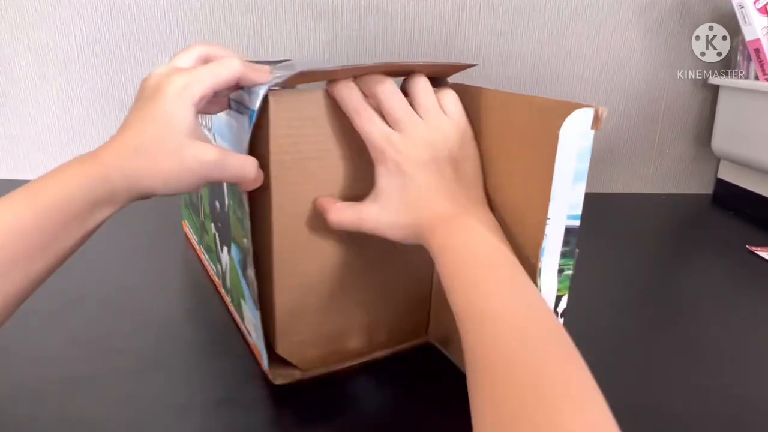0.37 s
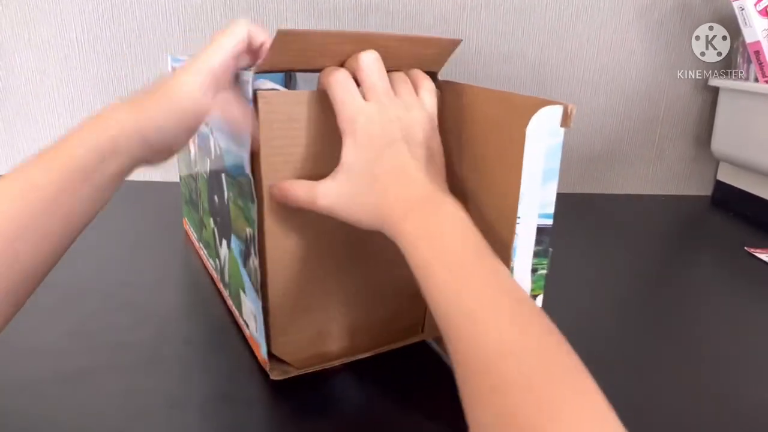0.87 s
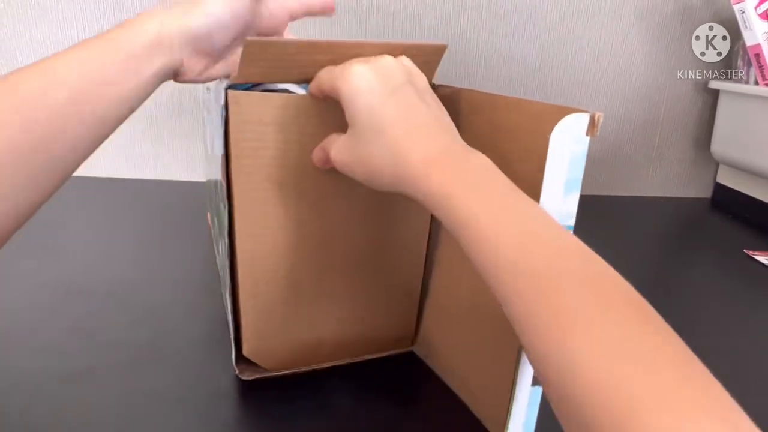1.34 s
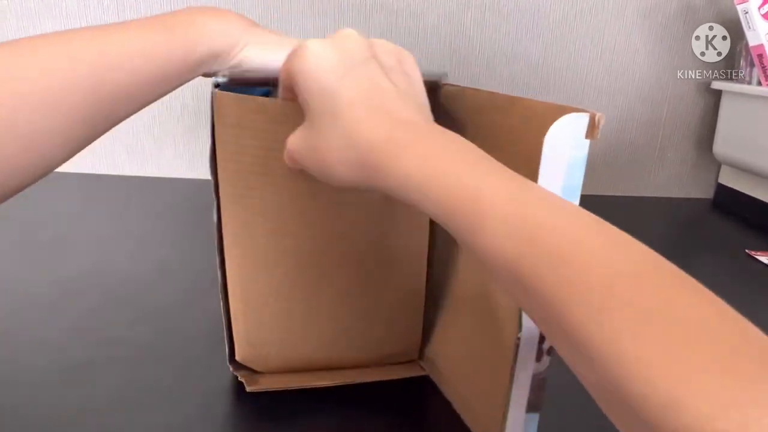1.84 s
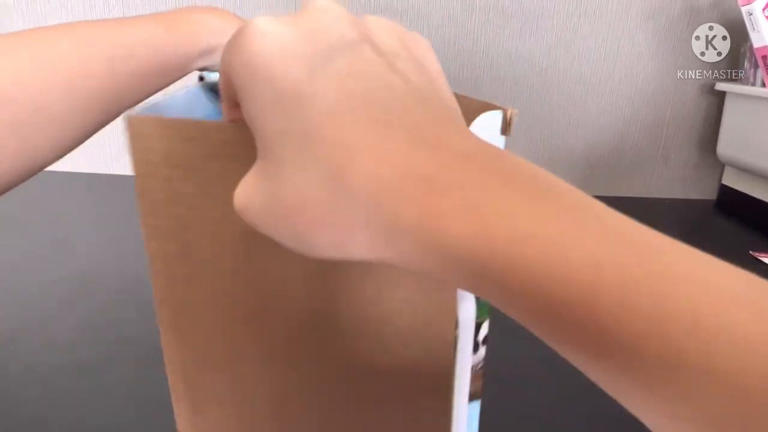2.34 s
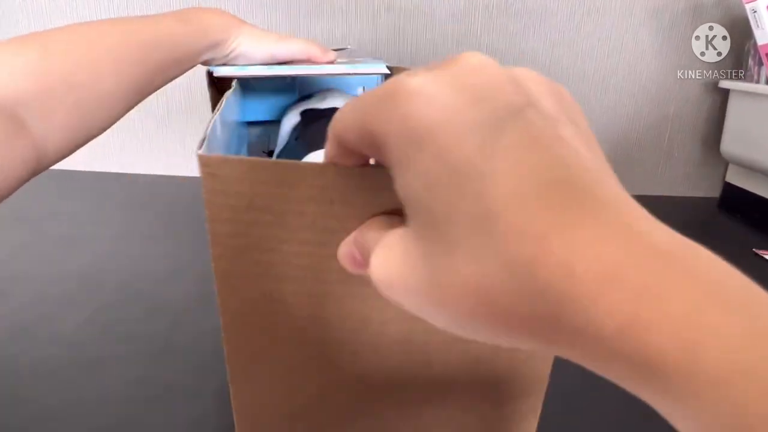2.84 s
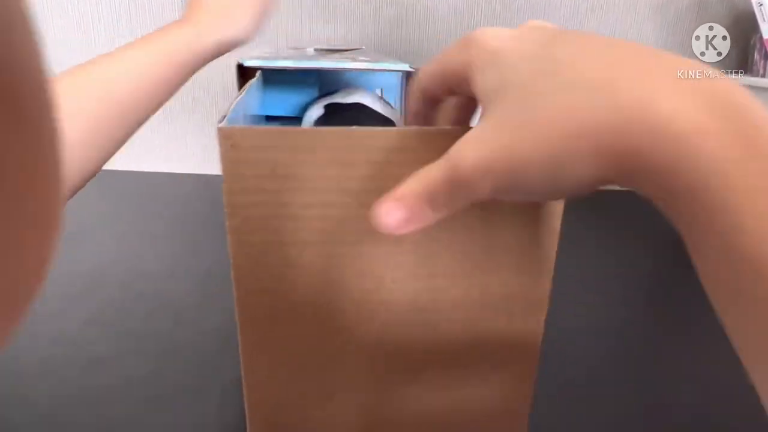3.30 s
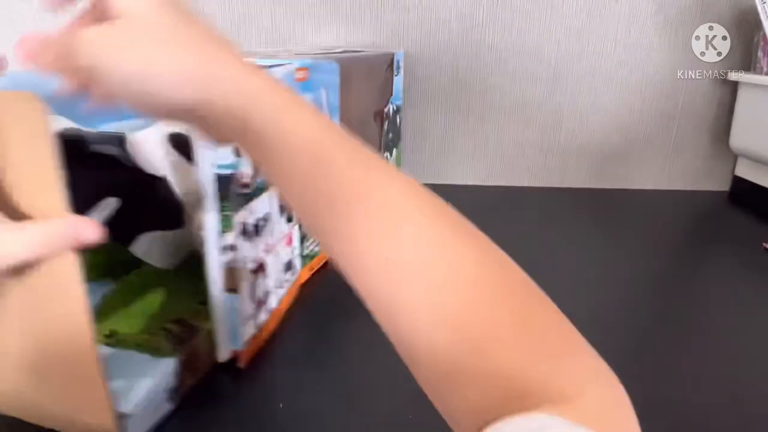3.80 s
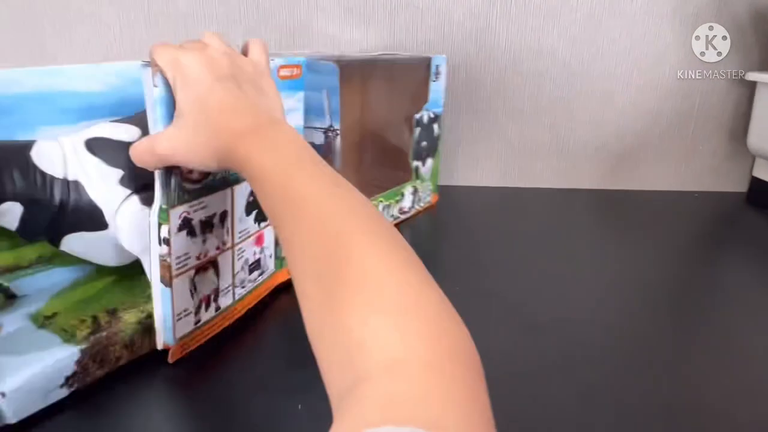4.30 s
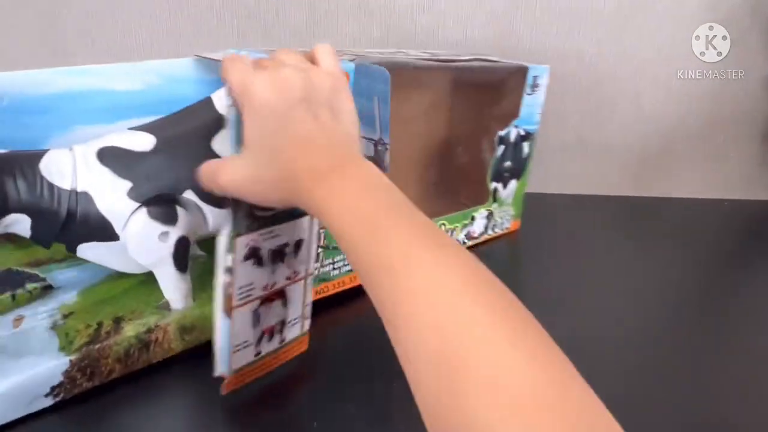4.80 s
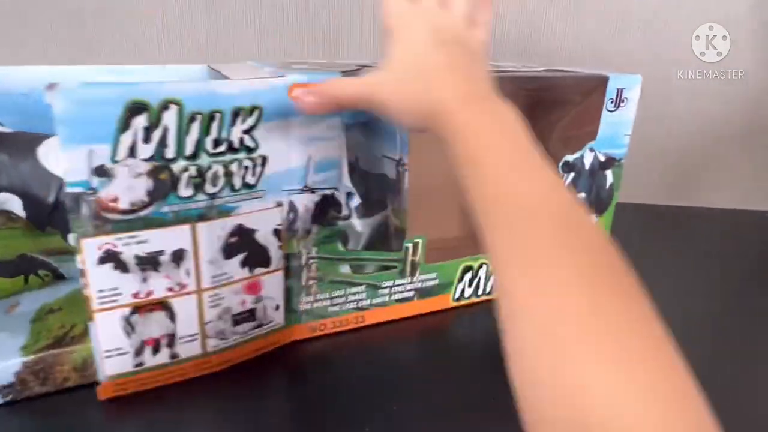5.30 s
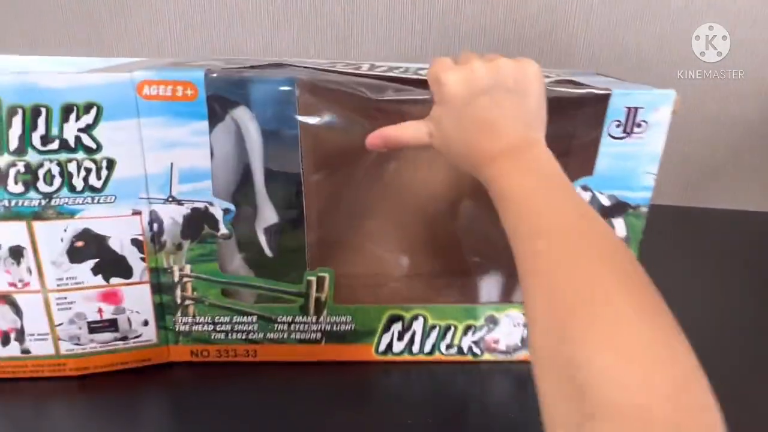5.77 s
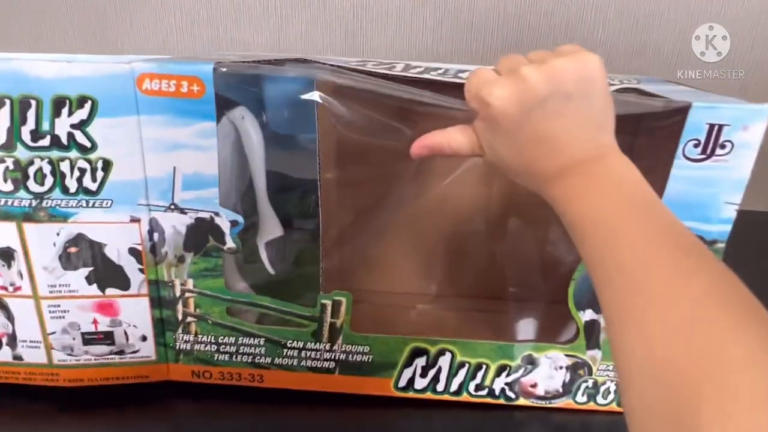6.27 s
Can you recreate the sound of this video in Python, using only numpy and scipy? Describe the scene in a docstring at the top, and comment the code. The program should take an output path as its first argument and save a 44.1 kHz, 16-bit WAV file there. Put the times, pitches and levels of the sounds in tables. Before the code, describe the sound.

Hands scuff and tap a cardboard toy box, tug out its tray with rasping scrapes, then thump and knock the box on a table.

```python
"""Quiet room air and hands resting on card; then scuffs, slides and taps as hands handle a toy box.
From 1.9 s tugs jerk its cardboard tray out: card slips densely on card and rings the hollow panels.
More slides follow; near 5.7 s the box thumps on a table, then edges and plastic window knock and snap.
Rubs are jolt noise through panel resonances, taps are shaped noise bursts through the same panels.
A phone hears it close by; its second port hears with a lag through the shadow of the case."""
import sys
import numpy as np
from scipy import signal
from scipy.fft import rfft, irfft, next_fast_len
from scipy.io import wavfile
from scipy.ndimage import uniform_filter1d

SR = 44100
rng = np.random.default_rng(int(sys.argv[2]) if len(sys.argv) > 2 else 0)


def gain_from_db(level_db):
    """Turn a decibel level (scalar or array-like) into a linear amplitude factor."""
    decades = np.asarray(level_db, float) / 20
    return 10 ** decades


def digitize_waveform(pressure):
    """Quantize a signal to 16-bit integers and store it at the path in sys.argv[1].

    Rows of a 2-D input are taken as channels; values are limited to [-1, 1].
    """
    field = np.atleast_2d(pressure).T
    bounded = np.clip(field, -1, 1)
    quanta = np.round(bounded * 32767).astype(np.int16)
    wavfile.write(sys.argv[1], SR, quanta)


N = 292824
SIZE = next_fast_len(N + 8192)
HZ = np.maximum(np.fft.rfftfreq(SIZE, 1 / SR), 1)
CARD_TOP_HZ = 2370  # soft card rings little above this

# box panels and cavity, base values: f/Hz, width/Hz, relative level/dB
BOX = [(215.3, 53, 3), (335.6, 63, -4.5), (469.3, 98, 1), (587, 123, -0.5), (730, 160, -10.5),
       (840, 240, -2.5), (1042, 200, -8), (1200, 120, -6), (1374, 113, -8.5), (1530, 67, -11.5),
       (1690, 97, -5), (1830, 74, -8.5)]
# what is handled: t/s, boom of panels below 400 Hz/dB, very top/dB (glossy card, plastic bright; bare card dull)
HOLLOW = [(0, 5, 5.5), (2.6, -6, -4.5), (5.45, -4.5, -4), (5.95, 9, 7), (6.03, 5, -18)]
# fibre hiss and cracks, base colour: f/Hz, relative level/dB
FIBRE = [(900, -14.5), (1800, 3), (2150, 0.5), (2900, 3), (3400, -3), (4700, 2), (5600, -2.5), (6500, -6.5),
         (7800, -4.5), (9200, -3), (10000, -12), (11000, -9.5), (13600, -20.5), (15100, -49)]


def unit(x):
    """Scale to rms 1."""
    return x / np.sqrt(np.mean(x ** 2))


def across(table, column=1):
    """One column of a frequency table at every bin, interpolated over log f."""
    rows = np.array(table, float)
    return np.interp(np.log(HZ), np.log(rows[:, 0]), rows[:, column])


def over_time(table, column, t):
    """One column of a time table at t, interpolated linearly."""
    columns = np.transpose(table)
    return np.interp(t, columns[0], columns[column])


def low_pass(corner_hz, order):
    """Smooth roll-off gain for each bin, 1/2 at the corner."""
    return 1 / (1 + (HZ / corner_hz) ** order)


def shape(x, gain):
    """Filter by a gain for each bin."""
    return irfft(rfft(x, SIZE) * gain, SIZE)[..., :N]


def ring(x, hz, width_hz):
    """A two-pole resonance, gain 1 at its centre."""
    return signal.lfilter(*signal.iirpeak(hz, hz / width_hz, fs=SR), x)


def walk(rate_hz):
    """Random levels held 1 / rate_hz and slewed twice; spread near 1."""
    k = int(SR / rate_hz)
    steps = np.repeat(rng.standard_normal(N // k + 2), k)
    return 1.44 * uniform_filter1d(uniform_filter1d(steps, k), k)[:N]


def slips(spread_db):
    """Fibres letting go: many tiny jolts, a few large ones, capped at what a fibre can hold."""
    size = np.minimum(rng.exponential(size=N), 6)
    return unit(rng.standard_normal(N) * gain_from_db(spread_db * size))


def tail(t60_s, length_s=.4):
    """Decaying noise of unit energy."""
    t = np.arange(int(length_s * SR)) / SR
    h = rng.standard_normal(len(t)) * gain_from_db(-60 * t / t60_s)
    return h / np.sqrt(np.sum(h ** 2))


def room_air():
    """Steady coloured noise whose level wanders a little."""
    # room air and hand tremor on the phone: f/Hz, relative level/dB
    air_colour = [(15, 8.5), (50, 2), (130, -9), (400, -7.5), (1500, -19), (2500, -26.5), (6000, -24.5),
                  (13500, -39), (14800, -70)]
    air = shape(rng.standard_normal(N) * gain_from_db(walk(5.53)), gain_from_db(across(air_colour)))
    return unit(air) * gain_from_db(-46.5)


def hand_tremor():
    """Deep noise of the hand on the phone, rolled off from 45 Hz."""
    return unit(shape(rng.standard_normal(N), low_pass(45, 2))) * gain_from_db(-51.5)


def strokes():
    """Gains of rumble and hiss, and grip: strokes swell, hold and die away, their powers adding."""
    # fingers and flaps scuff the card: t/s, length/s, level/dB, treble re level/dB
    scuff_rows = [(.138, 0.0022, -44.5, -3.5), (.185, 0.019, -40.5, -6.5), (.3, 0.073, -41.5, -5),
                  (.375, 0.1, -38, -8), (.552, 0.049, -38.5, -6), (.68, 0.03, -42.5, -11),
                  (.825, 0.069, -42.5, -7.5), (1.162, 0.011, -35.5, 4), (1.61, 0.052, -37, -16),
                  (2.825, 0.076, -34, -3.5), (3.09, 0.093, -37.5, -6), (3.285, 0.01, -38, -7.5),
                  (4.185, 0.08, -36.5, -7), (4.46, 0.019, -44, 6), (6.12, 0.053, -42, 3)]
    # the tray comes out of the box in tugs: t/s, length/s, level/dB, treble re level/dB
    tug_rows = [(1.945, 0.066, -20.5, -3), (2.15, 0.065, -23.5, -3), (2.375, 0.091, -24, -0.5),
                (2.61, 0.093, -28.5, -2)]
    # long even slides of hand, tray and box: t/s, length/s, level/dB, treble re level/dB
    slide_rows = [(1.09, 0.14, -42.5, -4), (1.55, 0.41, -44, -13), (2.8, 0.4, -42.5, -6),
                  (3.46, 0.33, -35.5, -6), (3.88, 0.18, -42.5, -13), (4.3, 0.24, -47, -5),
                  (4.92, 0.11, -39.5, -8), (5.45, 0.073, -32.5, -1.5), (5.62, 0.13, -35.5, -10.5),
                  (5.88, 0.11, -46.5, -0.5), (6.5, 0.1, -47, -4.5)]
    resting_db, resting_treble_db = -57, -12  # hands lying on the card
    t = np.arange(0, N + 64, 64) / SR
    low = gain_from_db(resting_db) ** 2
    high = gain_from_db(resting_db + resting_treble_db) ** 2
    lows = []
    for rows, rise_db_per_s, fall_db_per_s in ((scuff_rows, 912, 379),
                                               (tug_rows, 399, 183),
                                               (slide_rows, 79, 95)):
        for s, length_s, db, treble_db in rows:
            before_s = np.maximum(s - t, 0)
            after_s = np.maximum(t - s - length_s, 0)
            now_db = db - rise_db_per_s * before_s - fall_db_per_s * after_s
            low = low + gain_from_db(now_db) ** 2
            high = high + gain_from_db(now_db + treble_db) ** 2
        lows.append(low)
    grip = lows[1] / low  # power share of all but the slides
    return (np.interp(np.arange(N) / SR, t, np.sqrt(p)) for p in (low, high, grip))


def rubbing():
    """Card judders over card; big slips shake every panel, small ones only their own."""
    # where the card is rubbed decides which panel answers most: t/s, favoured f/Hz, lift there/dB
    rub_spot = [(1.17, 900, 1), (1.24, 1760, 16), (1.92, 1810, 16.5), (2.0, 630, 0), (3.45, 820, -7),
                (3.56, 1480, 13), (3.73, 1530, 24), (3.79, 660, -4), (4.0, 720, 6), (4.07, 1550, 11),
                (4.17, 1510, 10.5), (4.8, 493, -3), (5.25, 474, 8), (5.5, 1110, 17), (5.62, 580, 7)]
    t = np.arange(N) / SR
    rumble, hiss, grip = strokes()
    spot_hz, lift_db = over_time(rub_spot, 1, t), over_time(rub_spot, 2, t)
    boom_db, gloss_db = over_time(HOLLOW, 1, t), over_time(HOLLOW, 2, t)
    judder_db = (1.44 + 0.85 * grip) * walk(220)  # gripping strokes stick and slip, slides run more even
    big = slips(4.44) * gain_from_db(3.0 * walk(300))
    panels, power = 0, 0
    for hz, width_hz, db in BOX:
        nearness = np.exp(-(np.log2(hz / spot_hz) / .13) ** 2)  # distance in octaves
        gain = gain_from_db(db + boom_db * (hz < 400) + lift_db * nearness)
        small = slips(3.03) * gain_from_db(4.4 * walk(80))
        panels = panels + gain * ring(small + 0.69 * big, hz, width_hz)
        power = power + gain ** 2 * width_hz
    thud = shape(slips(4.0), low_pass(110, 2))
    fibre = unit(shape(slips(3.26) * gain_from_db(1.0 * walk(90)), gain_from_db(across(FIBRE))))
    top = shape(fibre, 1 - low_pass(8500, 6))
    fibre = fibre + top * (gain_from_db(gloss_db) - 1)
    # dividing by the expected power leaves the stroke level in charge
    body = unit(shape(panels / np.sqrt(power), low_pass(CARD_TOP_HZ, 6)))
    body = body + gain_from_db(-15.0) * unit(thud)
    return rumble * body * gain_from_db(judder_db) + hiss * fibre * gain_from_db(judder_db / 2)


def taps():
    """A rough push rings panels nearest the struck spot; hard contacts are brief and crack to the top."""
    # fingers and flaps brush the card, then tap it:
    # t/s, panel peak before roll-off/dB, favoured f/Hz, crack re peak/dB
    tap_rows = [(0.352, -19.5, 1280, -0.5), (0.368, -10.5, 1140, -8.5), (0.398, -26.5, 500, -10),
                (0.442, -27.5, 1200, -5), (0.526, -27, 1490, -12), (0.576, -22, 900, -12.5),
                (0.827, -23.5, 802, -9.5), (0.875, -18.5, 466, -9.5), (1.095, -9, 840, -4.5),
                (1.16, -16, 1010, 0.5), (1.202, -24, 1660, 6.5), (1.22, -13, 1830, -13.5),
                (2.022, -8, 700, -15), (2.052, -9, 590, -36), (2.201, -13.5, 200, -5),
                (2.377, -9, 840, -14), (2.44, -7, 840, -12.5), (2.477, -6, 1230, -19),
                (2.603, -20.5, 1080, 4.5), (2.959, -12.5, 900, 3), (2.966, -17.5, 486, -18),
                (3.112, -22, 684, -23), (3.145, -15.5, 1000, -7), (3.346, -15, 565, -16.5),
                (3.391, -13, 990, -7), (3.403, -14, 1090, -5.5), (3.554, -17, 730, -20),
                (4.229, -18, 1160, -3.5), (4.492, -18, 960, -14), (4.912, -19, 620, -17.5),
                (4.94, -23, 560, -32), (5.039, -23, 432, -25), (5.248, -20.5, 460, -28),
                (5.617, -21.5, 400, -33), (5.686, -19, 597, -34), (5.653, -10, 550, -17),
                (5.731, -21, 248, -20), (6.033, -23.5, 400, -42), (6.346, -14, 800, -16.5)]
    # box edges and plastic window strike without warning: columns as above
    knock_rows = [(5.814, -24.5, 1860, 22), (5.826, -8.5, 480, 5.5), (5.934, -19, 1190, -14),
                  (6.064, -19, 1050, -2), (6.088, -4.5, 600, -12.5), (6.11, -0.5, 430, -6),
                  (6.438, -8, 1290, -4.5), (6.452, -12.5, 780, -5.5)]
    brush_s, brush_db, bounce_s, bounce_db = 0.005, -9.5, 0.00714, -8
    lead_s = 4 * brush_s
    body, crack, top = np.zeros((3, N + 4096))
    t = np.arange(4096) / SR
    rows = [(*r, gain_from_db(brush_db)) for r in tap_rows] + [(*r, 0) for r in knock_rows]
    for s, peak_db, spot_hz, crack_db, brush in rows:
        rough, snap = rng.standard_normal((2, 4096))
        luck = rng.standard_normal(len(BOX))
        contact_s = 0.00094 * gain_from_db(-.4 * max(crack_db, -22))

        def contact(at_s):
            """One press, swelling to 1 after contact_s."""
            phase = np.maximum(t - at_s, 0) / contact_s
            return phase * np.exp(1 - phase)

        swell = contact(lead_s)
        swell = swell + gain_from_db(bounce_db) * contact(lead_s + bounce_s * (.5 + rng.random()))
        swell = swell + brush * np.exp(-np.abs(t - lead_s) / brush_s)
        push = rough * swell
        push[int(lead_s * SR)] += 0.22 * np.sqrt(np.sum(push ** 2))  # the first touch is one clean jolt
        knock = 0
        for (hz, width_hz, db), chance in zip(BOX, luck):
            near_db = max(-12.0 * np.log2(hz / spot_hz) ** 2, -12) + 3.5 * chance
            knock = knock + gain_from_db(db + near_db) * ring(push, hz, 0.62 * width_hz)
        i = int((s - lead_s) * SR)
        body[i:i + 4096] += gain_from_db(peak_db) * knock / np.abs(knock).max()
        age_s = np.maximum(t - lead_s, 0)
        crackle = gain_from_db(-10.5) * (1 - np.exp(-age_s / contact_s)) * np.exp(-age_s / 0.0047)
        snap = gain_from_db(peak_db + crack_db) * snap * (swell + crackle)
        crack[i:i + 4096] += snap
        top[i:i + 4096] += snap * gain_from_db(over_time(HOLLOW, 2, s))
    colour = gain_from_db(across(FIBRE) / 2)  # half the tilt of the hiss
    below = low_pass(8000, 8)
    panels = shape(body[:N], low_pass(CARD_TOP_HZ, 6))
    cracks = shape(crack[:N], colour * below)
    tops = shape(top[:N], colour * (1 - below) * gain_from_db(-6.5))
    return panels + cracks + tops


def thumps():
    """The box's weight lands on the table: a low sine swells over 13 ms and dies away."""
    # heavy landings: t/s, envelope peak/dB, f/Hz
    landings = [(5.735, -28.5, 56)]
    t, out = np.arange(N) / SR, 0
    for s, peak_db, hz in landings:
        age = np.maximum(t - s, 0) / 0.013
        out = out + gain_from_db(peak_db) * age * np.exp(1 - age) * np.sin(2 * np.pi * hz * (t - s))
    return out


def walls(near):
    """Room reflections: a short noise tail, duller than the direct sound."""
    echo = signal.fftconvolve(near, tail(0.45))[:N]
    return gain_from_db(-9.5) * shape(echo, low_pass(6000, 2))


def case_shadow(left):
    """The right port hears the left port's sound coloured and lagged by the case."""
    # right port against the left, ahead of a 0.8 dB cut: f/Hz, level/dB, lag/rad
    port = [(50, -6, -.2), (1000, -2.5, .1), (1800, 1, 1.1), (2100, -5, 2.2), (2350, -14, 1.4),
            (2700, -5, .9), (3100, 0, 1.8), (3900, -16, 1.5), (5200, -3, 1.2), (7400, -2, 4.3),
            (7900, -14, 4.3), (9700, -1, 3.3), (11000, 4, 4.8), (16000, 6, 10.3)]
    return shape(left, gain_from_db(across(port) - 0.8) * np.exp(-1j * across(port, column=2)))


def scene():
    """Left port; the right adds to it, through the case, independent rubbing noise of the same strokes
    and spots, tap scatter, air and tremor."""
    knocks = taps()
    near = rubbing() + knocks + thumps()
    left = near + walls(near) + room_air()
    scatter = signal.fftconvolve(knocks, tail(0.068, 0.042))[:N]
    right_only = rubbing() + scatter + room_air()
    right_only = gain_from_db(-6) * shape(right_only, HZ / (HZ + 1500))
    return np.array([left, case_shadow(left) + right_only + hand_tremor()])


def roll_off(x):
    """The treble ends steeply here."""
    return signal.sosfilt(signal.butter(12, 16570, fs=SR, output="sos"), x)


def record(dry):
    """Peaks beyond full scale are clipped."""
    return roll_off(np.clip(dry, -1, 1))


dry = scene()
out = record(dry)
digitize_waveform(out)
```